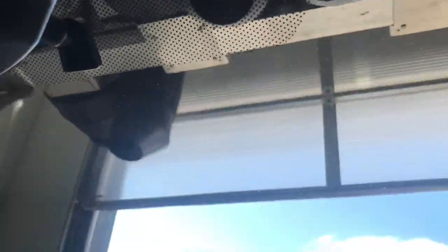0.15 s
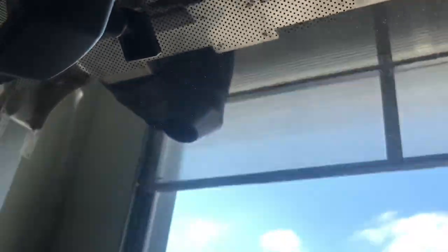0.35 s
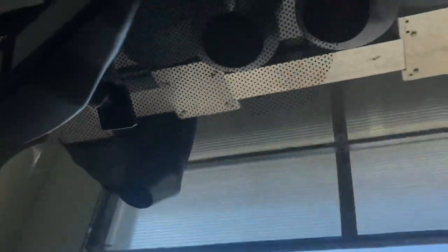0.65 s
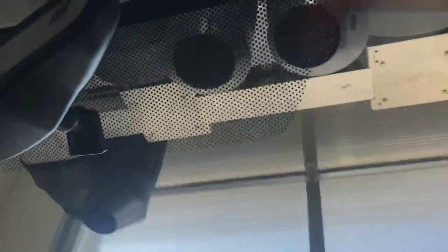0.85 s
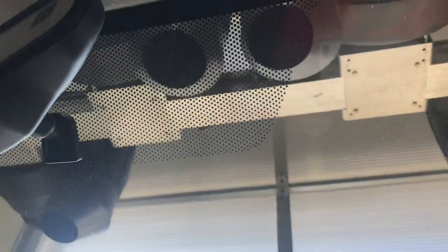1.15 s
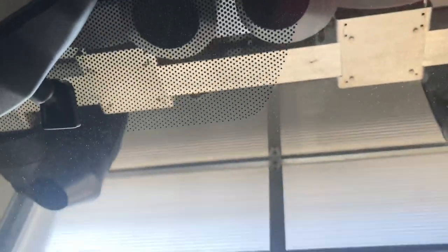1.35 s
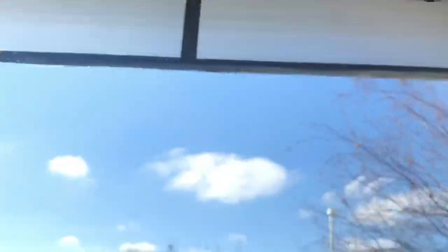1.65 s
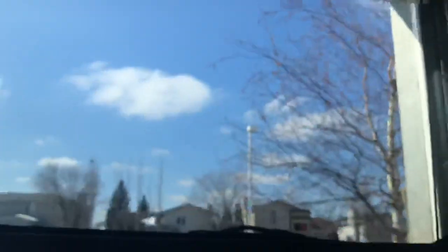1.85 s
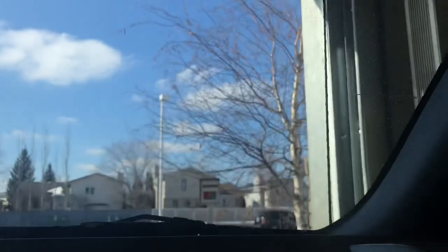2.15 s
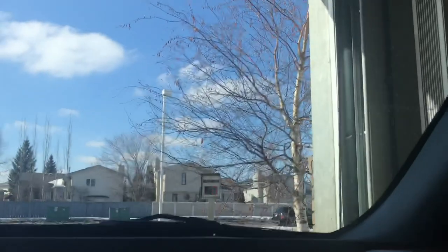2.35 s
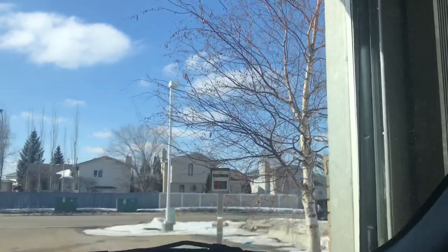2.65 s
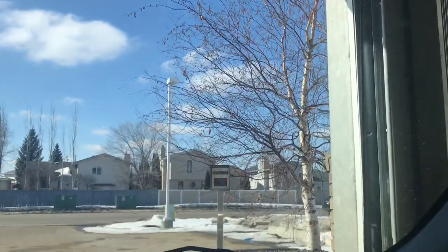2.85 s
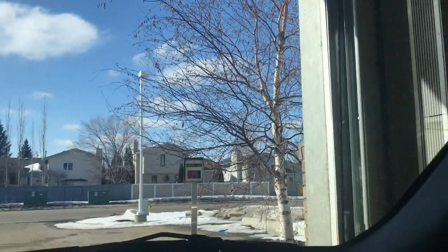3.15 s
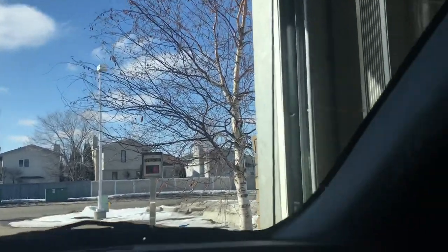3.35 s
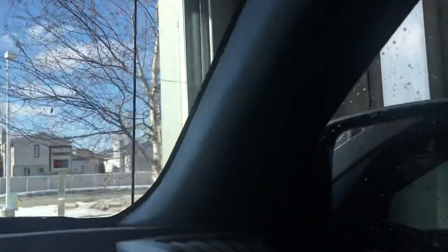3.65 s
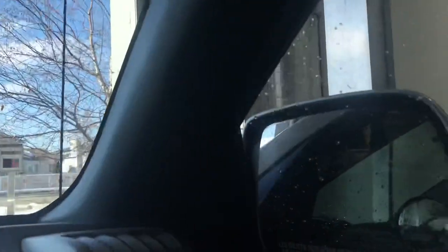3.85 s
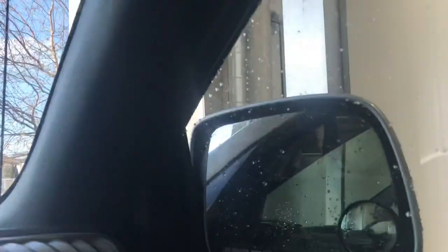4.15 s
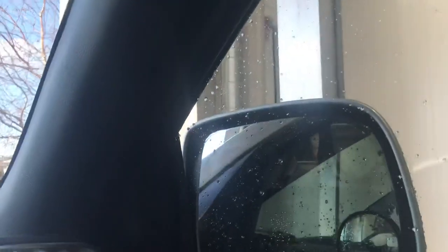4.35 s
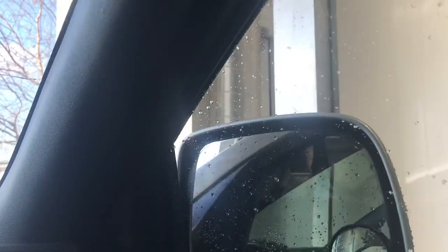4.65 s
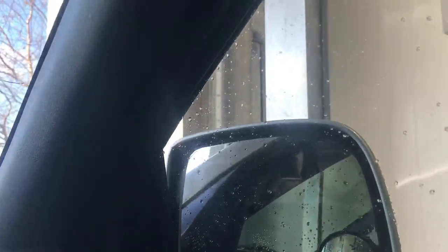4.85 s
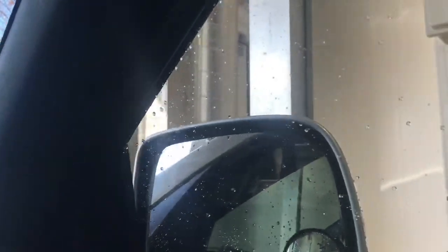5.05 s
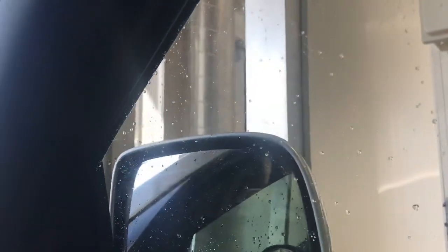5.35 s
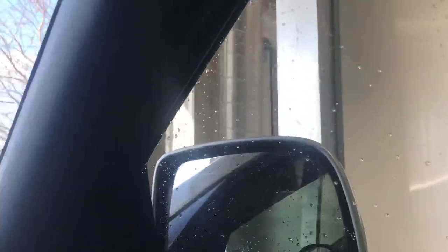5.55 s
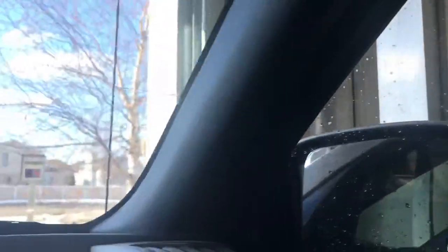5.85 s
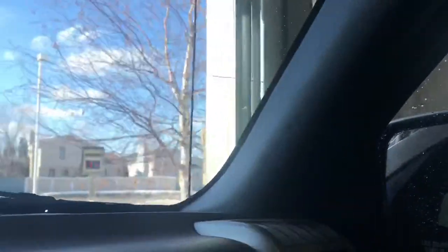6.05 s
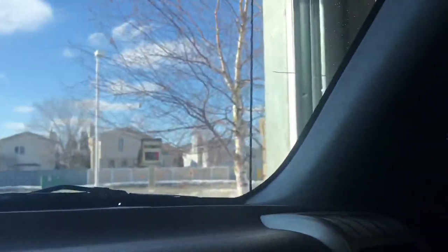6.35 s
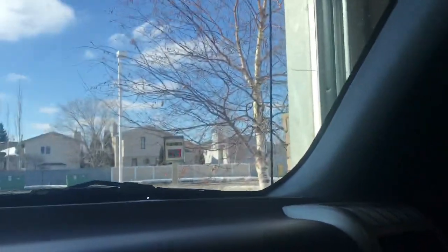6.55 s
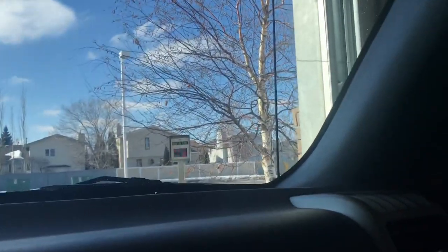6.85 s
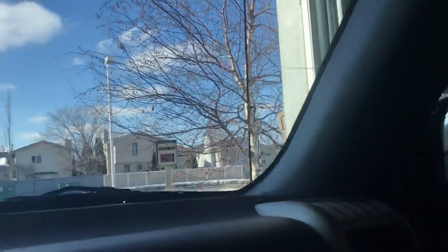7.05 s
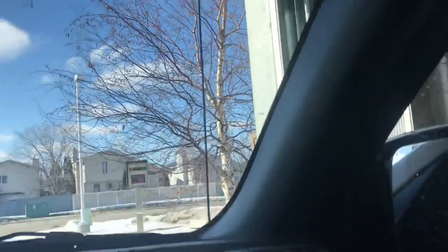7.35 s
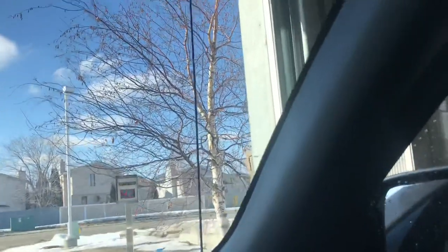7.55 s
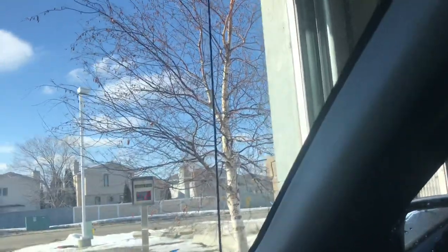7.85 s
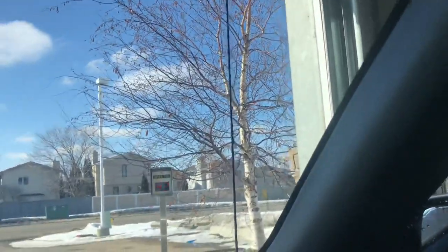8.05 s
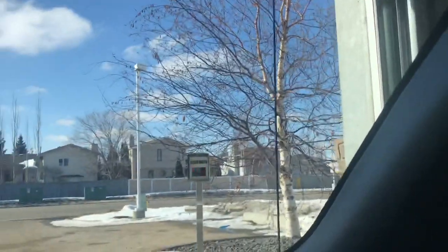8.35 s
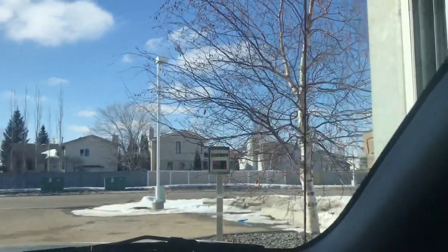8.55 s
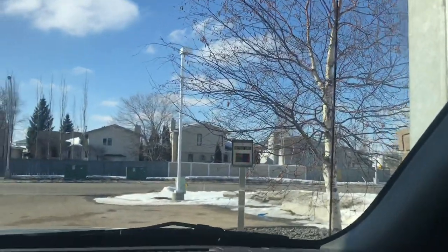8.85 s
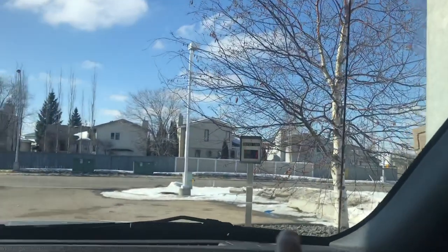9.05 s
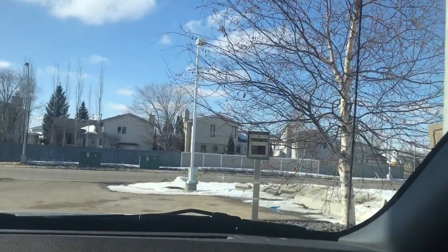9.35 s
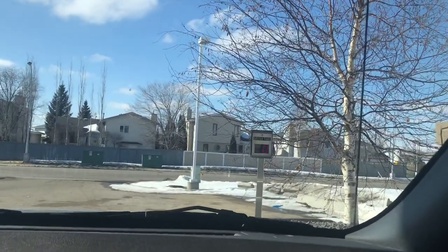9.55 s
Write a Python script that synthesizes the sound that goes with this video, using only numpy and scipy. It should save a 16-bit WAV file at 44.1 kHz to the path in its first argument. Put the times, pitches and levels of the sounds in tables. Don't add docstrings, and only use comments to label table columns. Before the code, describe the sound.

From inside a closed car, powerful air dryers roar and boom over the bodywork, panels drumming, with faint rapid engine ticking and small rustles.

```python
import sys
import numpy as np
from scipy import signal
from scipy.fft import rfft, irfft, next_fast_len
from scipy.io import wavfile
from scipy.ndimage import uniform_filter1d, minimum_filter1d

SR = 44100
rng = np.random.default_rng(int(sys.argv[2]) if len(sys.argv) > 2 else 0)


def transcribe(signal):
    frames = np.atleast_2d(signal).T
    limited = np.clip(frames, -1, 1)
    pcm = np.round(limited * 32767).astype(np.int16)
    wavfile.write(sys.argv[1], SR, pcm)


def natural_amplitude(level_db):
    exponent = np.asarray(level_db, float) / 20
    return 10 ** exponent


N = 427329
TIME = np.arange(N) / SR
COARSE_TIME = TIME[::64]
SIZE = next_fast_len(N)
HZ = np.maximum(np.arange(SIZE // 2 + 1) * SR / SIZE, 1)
PASS_BAND = (HZ < 15720) / np.sqrt(1 + (33.0 / HZ) ** 12)


def rms_one(x):
    return x / np.sqrt(np.mean(x ** 2) + 1e-20)


def in_time(rows):
    s, *columns = np.transpose(rows)
    return [np.interp(TIME, s, column) for column in columns]


def drift(rate):
    knots = rng.standard_normal(int(N / SR * 60) + 2)
    memory = np.exp(-2 * np.pi * rate / 60)
    slow = signal.lfilter([1], [1, -memory], np.tile(knots, 2))[len(knots):]
    return np.interp(TIME * 60, np.arange(len(slow)), rms_one(slow))


def white_spectrum():
    return (rng.standard_normal(len(HZ)) + 1j * rng.standard_normal(len(HZ))) * PASS_BAND


def coloured_noise(gain):
    return rms_one(irfft(white_spectrum() * gain, SIZE)[:N])


def resonance(hz, width_hz, order):
    detuning = (HZ / hz - hz / HZ) * hz / (1.96 * width_hz)
    return 1 / (1 + detuning ** 2) ** order


def bell(time, s, length_s):
    return np.exp(-.5 * ((time - s) / length_s * 2) ** 2)


# t/s, windscreen level/dB, roof level/dB, rear window level/dB, tail level/dB
JETS = [(0, 0.5, -23, -18, -25), (1, 0, -13, -15, -11), (1.5, 0, -10.5, -3, -23), (2, -4, -2, -8.5, -23),
        (2.5, -4, -5, -9, -13), (3, -5.5, -1.5, -12.5, -7.5), (3.6, -9.5, -1, -13, -11.5),
        (4.2, -10.5, -1, -10.5, -16), (5, -10, -1, -20.5, -14), (5.6, -12.5, 0, -21, -13.5),
        (6.1, -14.5, -1, -9, -12), (6.6, -12, -0.5, -9, -6.5), (7.1, -14, -3, -2.5, -5),
        (7.6, -18, -14, 1.5, -2), (8.1, -21.5, -16, 0, -1), (8.6, -18.5, -7.5, -4.5, 1),
        (9.1, -26.5, -2.5, -16.5, -2), (9.69, -17, -6.5, -26, -1)]


def jet_levels(coupling):
    coupled_power = natural_amplitude(np.transpose(coupling)) ** 2
    jet_power = natural_amplitude(np.array(in_time(JETS))[:, ::64]) ** 2
    levels_db = 10 * np.log10(coupled_power @ jet_power)
    return [np.interp(TIME, COARSE_TIME, level_db) for level_db in levels_db]


# t/s, mode f/Hz, swell level/dB, length t/s
BUFFETS = [(1.026, 90, 0, .12), (1.7, 60, 7, .08), (1.78, 90, 1, .06), (1.94, 43, 0.5, 0.11),
           (1.943, 60, 12, 0.073), (1.956, 131, 4, 0.092), (8.32, 60, -8, 0.18),
           (2.493, 90, 4.5, 0.28), (2.98, 131, 7.5, 0.13), (3.297, 43, 10.5, 0.093),
           (9.4, 60, 2, .15), (2.524, 131, 10, 0.13), (3.95, 60, 8, .1), (4.19, 131, 7.5, 0.076),
           (4.75, 43, 5.5, .2), (4.792, 131, 7, 0.05), (3.647, 131, 3, 0.092),
           (5.37, 60, 13.5, 0.076), (5.363, 131, 4.5, .1), (5.55, 43, -12.5, 0.12),
           (5.2, 131, -4.5, .2), (6.503, 131, -5, .15), (7.08, 90, 7, 0.055), (7.19, 60, 6.5, 0.088),
           (7.201, 131, 5, 0.053), (7.274, 43, 5, 0.069), (6.4, 43, 4, 0.61), (8.106, 60, 6.5, .08),
           (8.63, 43, 3, 0.13), (8.87, 43, 2, 0.087),
           (.1, 172, 0, 0.16), (0.625, 238, 5.5, 0.14), (1.08, 238, -1, .1), (1.614, 385, 8.5, 0.056),
                 (1.9, 172, 4, 0.3), (2.448, 385, 3, 0.058), (2.56, 172, 4.5, 0.14),
                 (2.898, 385, 2.5, 0.24), (3.897, 172, 1.5, 0.07), (5.526, 238, 3, .1),
                 (6.176, 385, 5.5, .1), (6.642, 705, 1, .08), (7.1, 705, 6, .08), (7.144, 238, 5, 0.22),
                 (7.1, 895, -2, 0.33), (7.905, 172, -3.5, 0.27), (8.09, 385, 3.5, 0.068),
                 (8.294, 385, 2.5, 0.037), (8.616, 385, 2, 0.32), (8.66, 172, -6, 0.11),
                 (8.87, 305, 13, .08), (8.898, 705, 3, 0.17), (9.185, 385, 4, 0.075), (9.2, 545, -3, .12),
                 (9.526, 705, 6.5, 0.089), (3.203, 131, 2.5, .5), (9.35, 172, 2.5, .4),
                 (2.247, 172, 3, 0.31), (1.294, 131, -7, 0.24)]
# from and to t/s, time to turn t/s
TURNED_S, TURN_S = (3.76, 6.07), .04
# f/Hz, level/dB
SHADOW = [(43, 0.5), (131, 0), (305, 2), (385, -3.5), (545, 0), (1350, -.5)]


def buffeting(mode_hz):
    swell_db = np.zeros(len(COARSE_TIME))
    for s, hz, db, length_s in BUFFETS:
        if abs(np.log(hz / mode_hz)) < .1:
            swell_db += db * bell(COARSE_TIME, s, length_s)
    turn_away = np.tanh((COARSE_TIME - TURNED_S[0]) / TURN_S)
    turn_back = np.tanh((COARSE_TIME - TURNED_S[1]) / TURN_S)
    hz, shadow_db = np.transpose(SHADOW)
    mode_shadow_db = np.interp(np.log(mode_hz), np.log(hz), shadow_db)
    return np.interp(TIME, COARSE_TIME, swell_db + (turn_away - turn_back) / 2 * mode_shadow_db)


def driven_modes(modes, coupling, steadiness, hold_s, eddy_db, eddy_rate):
    out = np.zeros(N)
    hold = int(hold_s * SR)
    for (hz, width_hz), level_db in zip(modes, jet_levels(coupling)):
        ringing = coloured_noise(resonance(hz, width_hz, 1.5))
        power = uniform_filter1d(uniform_filter1d(ringing ** 2, size=hold), size=hold)
        evened = rms_one(ringing / (power + .02) ** (steadiness / 2))
        out += natural_amplitude(level_db + buffeting(hz) + eddy_db * drift(eddy_rate)) * evened
    return out


# f/Hz, width f/Hz
CABIN_MODES = [(43, 6.5), (60, 24), (90, 44), (131, 10.5)]
CABIN_COUPLING = [(-43, -25.5, -19, -30.5), (-25.5, -29, -23, -17.5), (-25.5, -24.5, -25.5, -23),
                  (-19.5, -19, -29, -30)]


def cabin_boom():
    return driven_modes(CABIN_MODES, CABIN_COUPLING, steadiness=0.56, hold_s=0.07, eddy_db=0.94, eddy_rate=6.2)


# f/Hz, width f/Hz
PANEL_MODES = [(172, 46.4), (238, 42), (305, 54), (385, 90.6)]
PANEL_COUPLING = [(-23.5, -29, -26, -26.5), (-18.5, -28.5, -35, -35), (-30.5, -30, -43, -35.5),
                  (-20.5, -30, -39.5, -22)]


def panel_drumming():
    return driven_modes(PANEL_MODES, PANEL_COUPLING, steadiness=.55, hold_s=0.12, eddy_db=.5, eddy_rate=4.9)


# f/Hz, width f/Hz
ROAR_BANDS = [(545, 190), (705, 190), (895, 486), (1350, 505)]
ROAR_COUPLING = [(-41.5, -43, -36.5, -38), (-39.5, -48.5, -41.5, -52.5), (-32, -44.5, -36.5, -42.5),
                 (-39.5, -40, -46.5, -52)]


def jet_roar():
    return driven_modes(ROAR_BANDS, ROAR_COUPLING, steadiness=0.14, hold_s=0.13, eddy_db=-0.5, eddy_rate=2.2)


# f/Hz, level/dB
RUSH = [(820, -23.5), (1400, -3), (2160, -6), (3410, -10), (4430, -14), (5010, -18.5), (6130, -23.5),
        (10400, -37.5), (14300, -42.5), (15700, -47.5)]
# f/Hz, width f/Hz, level/dB
PORT = [(2330, 120, 2.5), (4900, 450, -3), (6050, 420, 2), (7740, 690, -3), (10450, 700, -3.5)]
RUSH_REGIONS_HZ = [1950, 2550, 3800, 6200]
RUSH_COUPLING = [(7.5, 11, 6.5, 9.5), (-4.5, -4, -3, -4), (-5, -5.5, -4, -4.5), (-30, -12, -5.5, -8)]


def air_rush():
    hz, level_db = np.transpose(RUSH)
    colour_db = np.interp(np.log(HZ), np.log(hz), level_db)
    for centre_hz, width_hz, db in PORT:
        colour_db += db / (1 + ((HZ - centre_hz) / width_hz * 2) ** 2)
    above_roar = 1 / (1 + (1600 / HZ) ** 6)
    rush = rfft(coloured_noise(natural_amplitude(colour_db) * above_roar), SIZE)
    out = np.zeros(N)
    for k, level_db in enumerate(jet_levels(RUSH_COUPLING)):
        region = np.interp(np.log(HZ), np.log(RUSH_REGIONS_HZ), np.arange(4) == k)
        flutter_db = 0.21 * drift(23.0)
        out += natural_amplitude(level_db + flutter_db) * irfft(rush * region, SIZE)[:N]
    return natural_amplitude(-44) * out


ECHO_LAGS_S = [.0013, .0021, .0034, .0047, .0066, .0089, .0118]


def cabin_echoes(x, echo_db, change_rate):
    mixed, power = x.copy(), 1.0
    for lag_s in ECHO_LAGS_S:
        gain = natural_amplitude(echo_db) * drift(change_rate)
        mixed += gain * np.roll(x, int(lag_s * SR))
        power = power + gain ** 2
    return mixed / np.sqrt(power)


def microphone_hiss():
    return natural_amplitude(-70.5) * coloured_noise(1 + .3 * (HZ / 15500) ** 6)


# t/s, cycle rate f/Hz
ENGINE_SPEED = [(0, 14.414), (1.3, 14.331), (2, 14.885), (2.7, 16.45), (3.5, 17.706), (4.5, 17.944),
                (5.7, 18.169), (7, 18.999), (8.2, 19.97), (9.7, 20.537)]
START_CYCLE = -.652
# share of cycle [1], f/Hz, level/dB, length t/s
INJECTORS = [
    (-.05, 13800, -4.0, .0011),
    (.005, 14250, 0.0, .0008),
    (.055, 14050, -9.0, .0011),
    (.48, 14800, -13.0, .0018),
    (.71, 14800, -14.0, .0018),
]
# t/s, level/dB
TICK_LEVEL = [(0, -73), (1.4, -68), (2, -55), (2.4, -55), (2.75, -65.5), (3.2, -66), (3.6, -58.5),
              (4.1, -65), (4.4, -68), (4.8, -67), (5.5, -68), (5.9, -71), (6.2, -58), (6.75, -64),
              (7.2, -62), (7.6, -62.5), (8.4, -61.5), (9.2, -69.5)]


def injectors():
    speed, = in_time(ENGINE_SPEED)
    cycle = START_CYCLE + 1 + np.cumsum(speed) / SR
    out = np.zeros(N)
    for share, hz, db, length_s in INJECTORS:
        turn = np.maximum(cycle - share + .5, 0)
        chance = rng.standard_normal((int(cycle[-1]) + 2, 3))[turn.astype(int)].T
        offset_s = (turn % 1 - .5) / speed + .0004 * chance[0]
        ping = np.sin(2 * np.pi * (hz + 70 * chance[1]) * offset_s)
        envelope = np.exp(-.5 * (offset_s / length_s) ** 2)
        out += natural_amplitude(db + 2.5 * chance[2]) * envelope * ping
    return natural_amplitude(in_time(TICK_LEVEL)[0] + 2.2) * out


# t/s, length t/s, f/Hz, width f/Hz, level/dB
RUSTLES = [(7.60, .28, 6050, 260, -63), (1.55, .3, 6500, 2000, -57), (8.0, .35, 6050, 260, -66),
           (7.735, .012, 1250, 300, -38), (9.15, .06, 1700, 300, -50), (7.3, 1.1, 890, 40, -42),
           (7.65, .5, 2200, 500, -52), (.8, 1.8, 2600, 140, -48), (2.4, .3, 2170, 90, -48),
           (7.18, .08, 4500, 150, -58), (9.115, .045, 9250, 500, -68), (9.125, .04, 11100, 500, -74),
           (9.145, .03, 9500, 5000, -68), (9.15, .07, 15500, 500, -79), (7.4, 2.6, 14850, 200, -88)]


def rustles():
    white = white_spectrum()
    out = np.zeros(N)
    for s, length_s, hz, width_hz, db in RUSTLES:
        band = rms_one(irfft(white * resonance(hz, width_hz, 2), SIZE)[:N])
        start = max(int((s - 2 * length_s) * SR), 0)
        span = slice(start, int((s + 2 * length_s) * SR))
        out[span] += natural_amplitude(db) * bell(TIME[span], s, length_s) * band[span]
    return out


def scene():
    low = cabin_boom() + panel_drumming()
    gust = natural_amplitude(.6 * drift(13.0))
    jets = cabin_echoes(gust * (jet_roar() + air_rush()), echo_db=-22.0, change_rate=.6)
    return (low + jets + microphone_hiss() + injectors() + rustles())[None]


def roll_off(x):
    return signal.sosfilt(signal.butter(12, 16190, fs=SR, output="sos"), x)


def record(dry):
    hold = int(.012 * SR)
    over_db = np.maximum(20 * np.log10(np.abs(dry) / .7 + 1e-9), 0)
    held_db = -minimum_filter1d(-over_db, size=hold, axis=1)
    limited = dry * natural_amplitude(-.6 * uniform_filter1d(held_db, size=hold, axis=1))
    return roll_off(limited)


dry = scene()
out = record(dry)
transcribe(out)
```